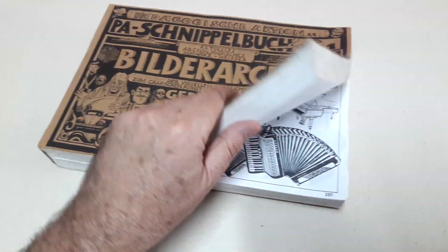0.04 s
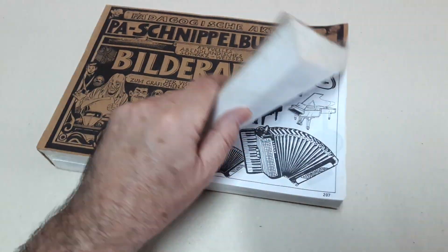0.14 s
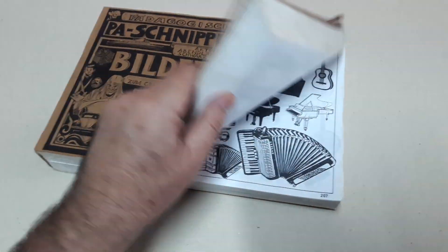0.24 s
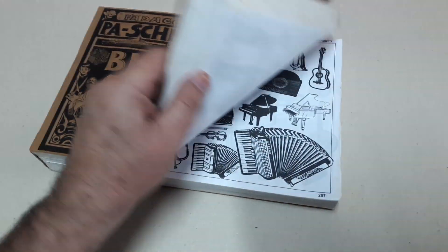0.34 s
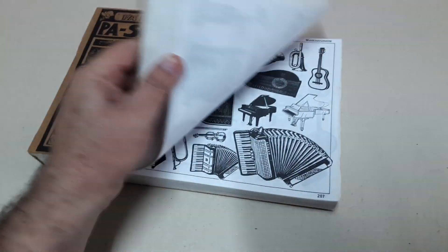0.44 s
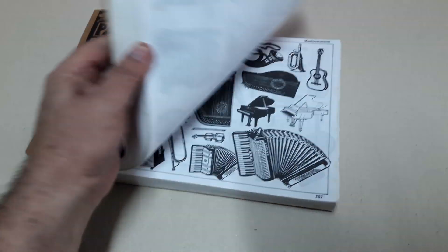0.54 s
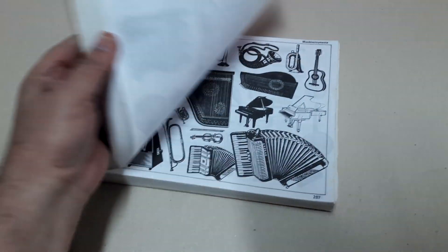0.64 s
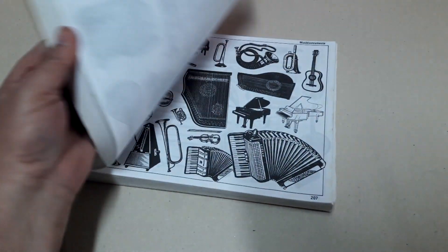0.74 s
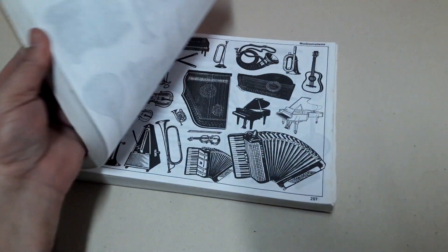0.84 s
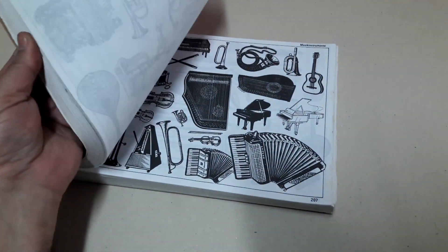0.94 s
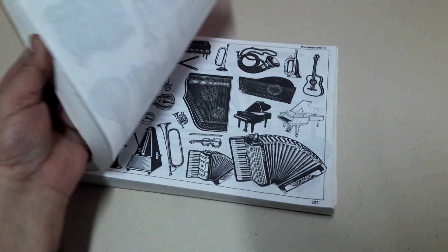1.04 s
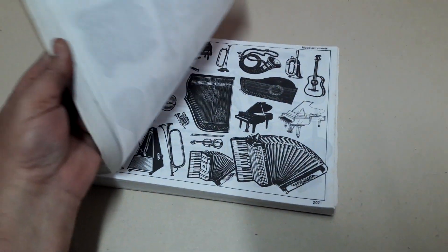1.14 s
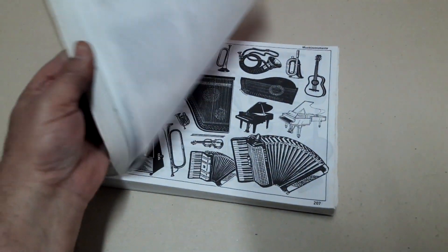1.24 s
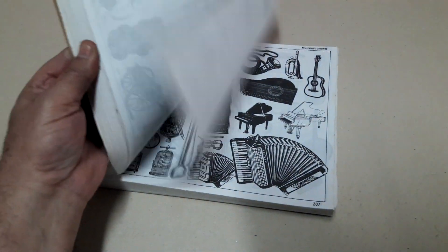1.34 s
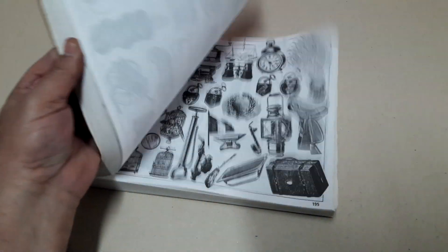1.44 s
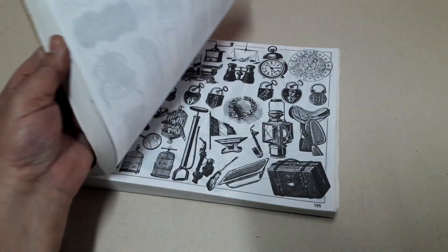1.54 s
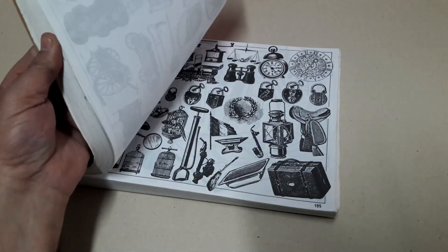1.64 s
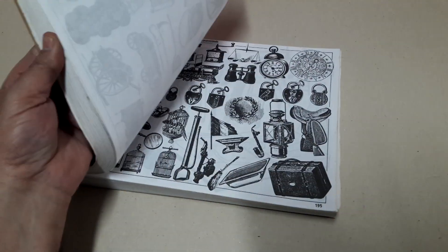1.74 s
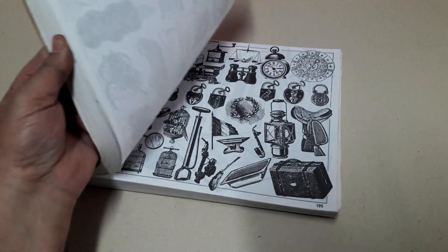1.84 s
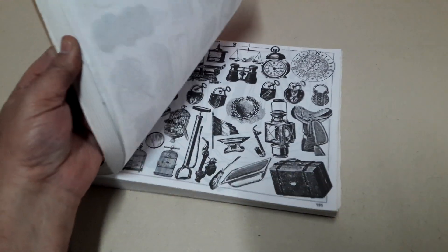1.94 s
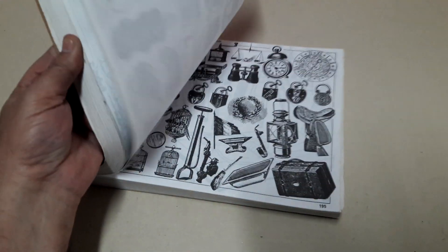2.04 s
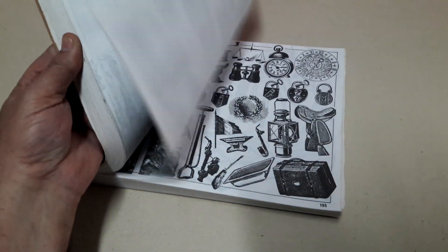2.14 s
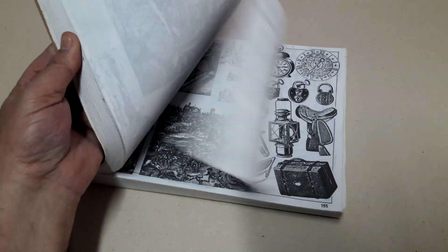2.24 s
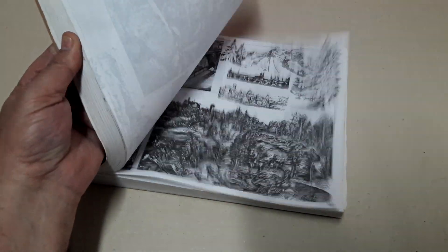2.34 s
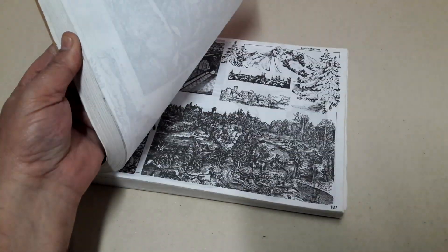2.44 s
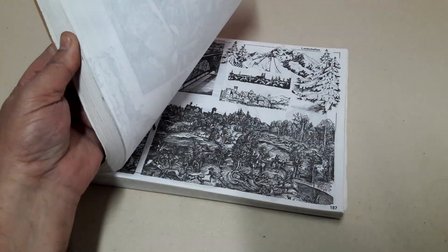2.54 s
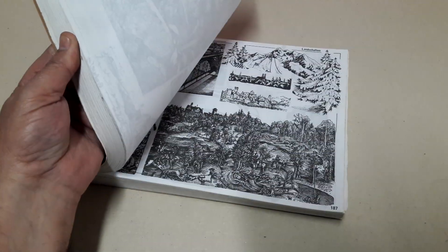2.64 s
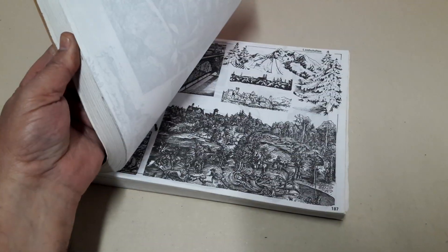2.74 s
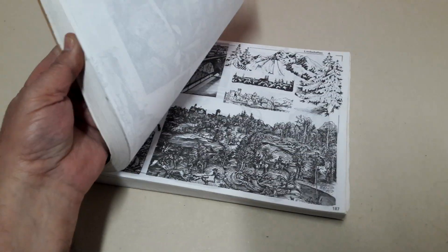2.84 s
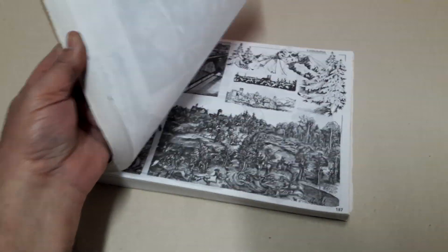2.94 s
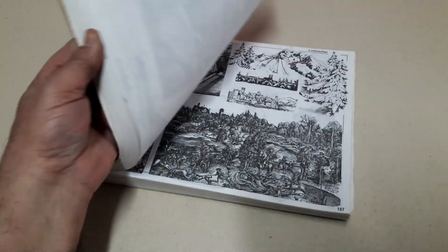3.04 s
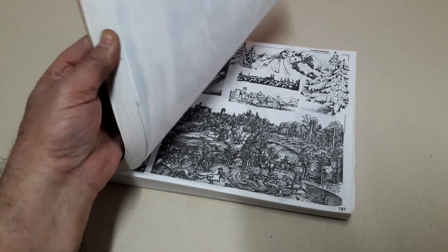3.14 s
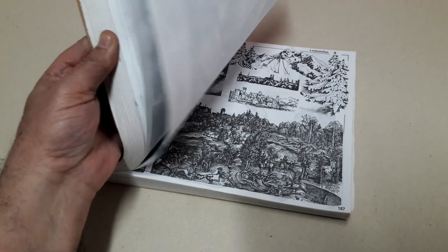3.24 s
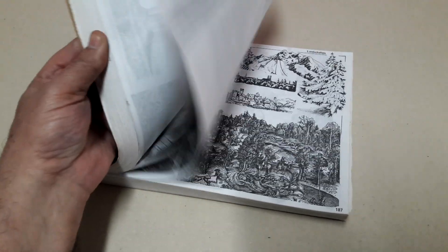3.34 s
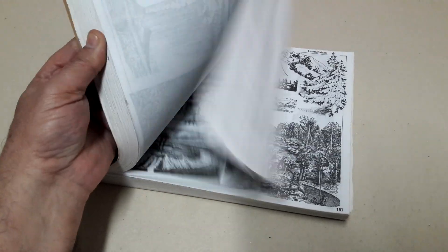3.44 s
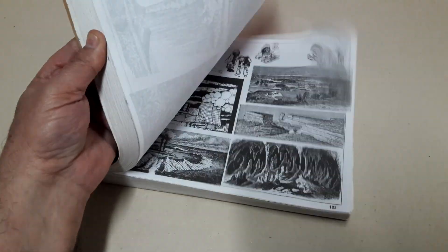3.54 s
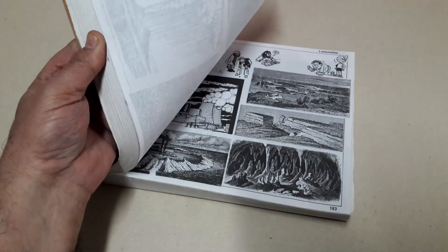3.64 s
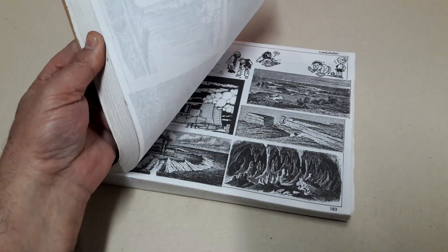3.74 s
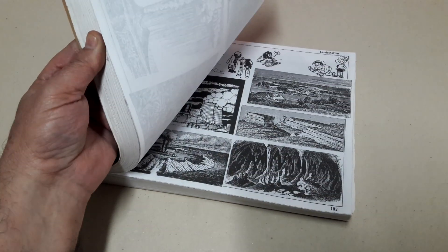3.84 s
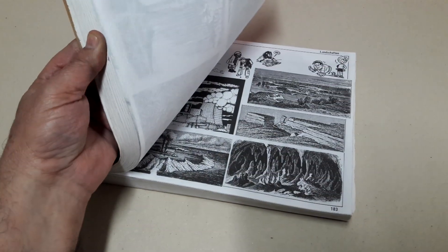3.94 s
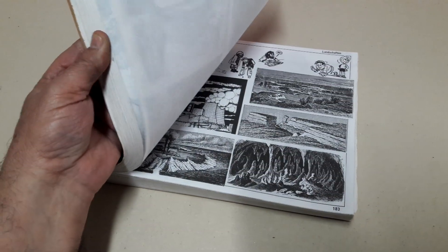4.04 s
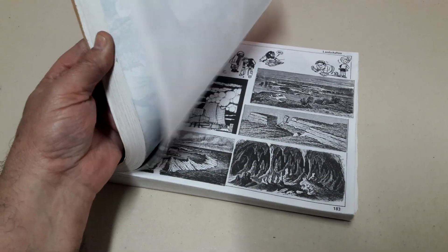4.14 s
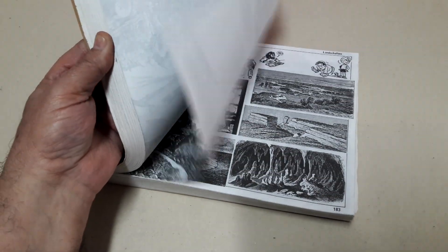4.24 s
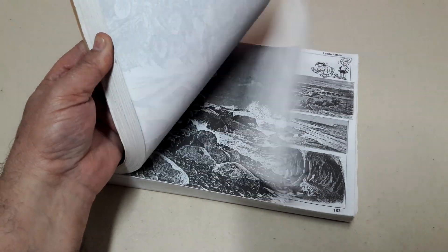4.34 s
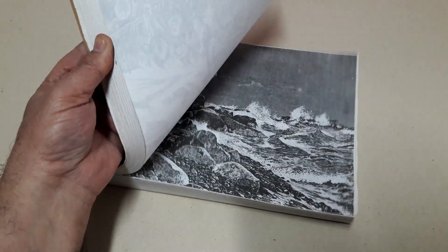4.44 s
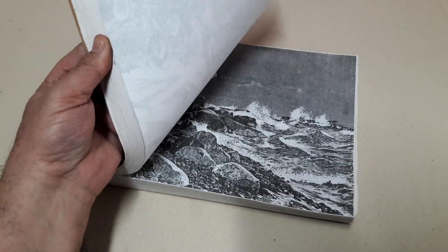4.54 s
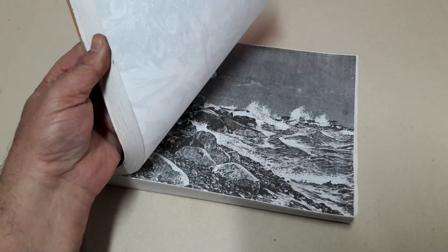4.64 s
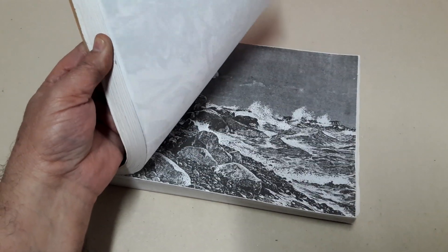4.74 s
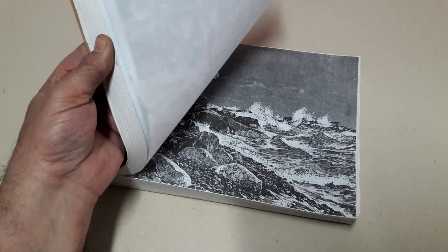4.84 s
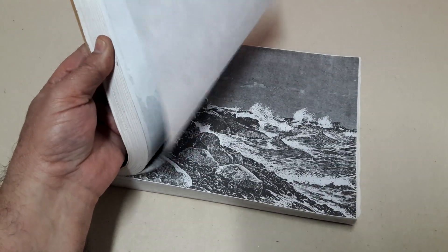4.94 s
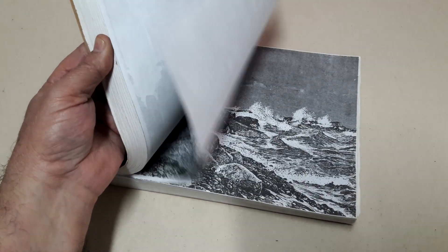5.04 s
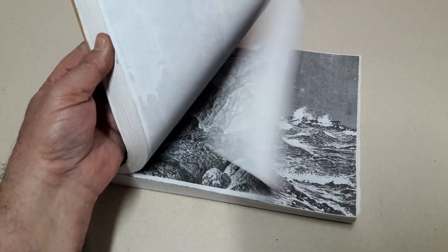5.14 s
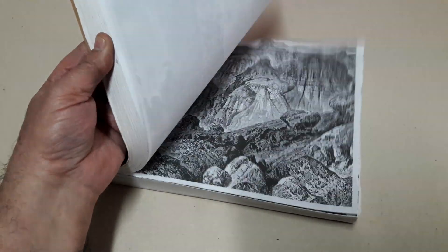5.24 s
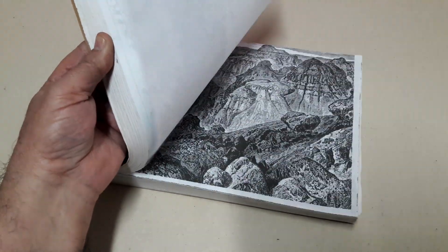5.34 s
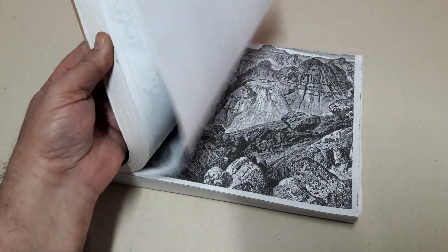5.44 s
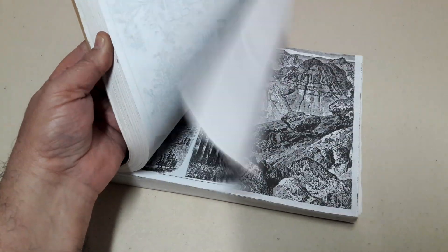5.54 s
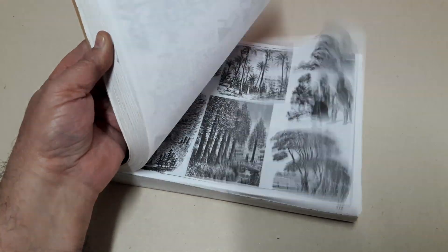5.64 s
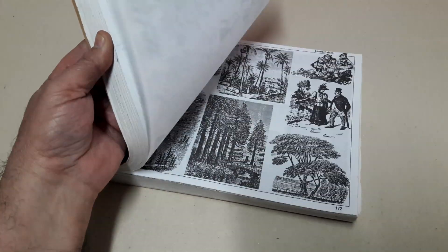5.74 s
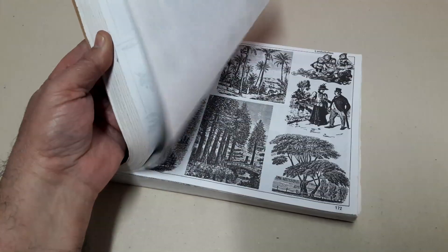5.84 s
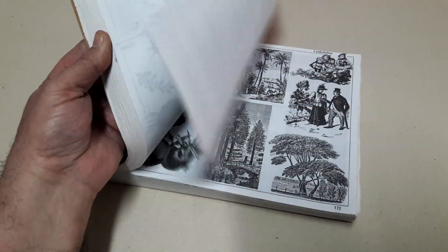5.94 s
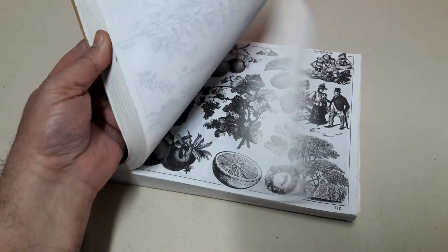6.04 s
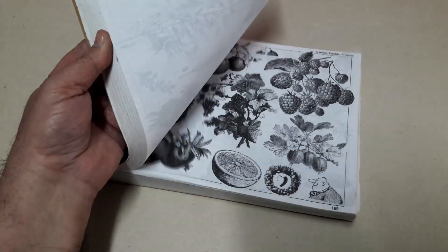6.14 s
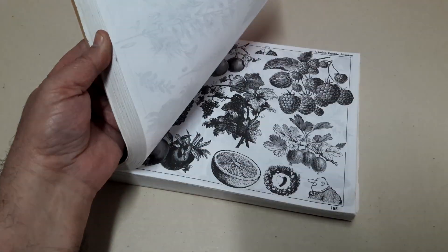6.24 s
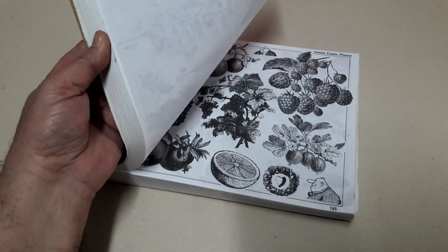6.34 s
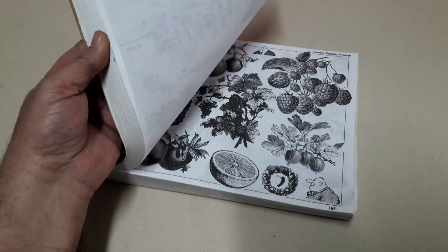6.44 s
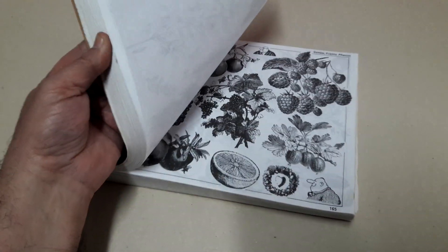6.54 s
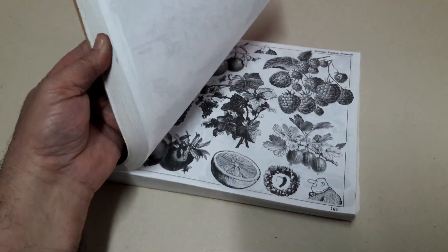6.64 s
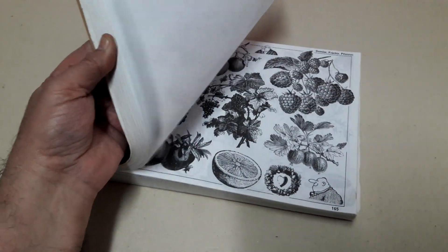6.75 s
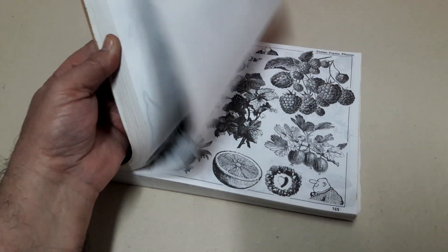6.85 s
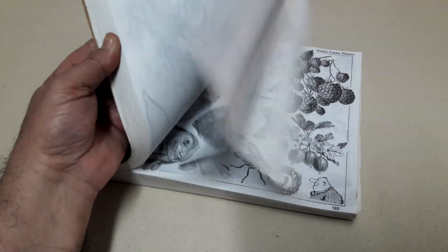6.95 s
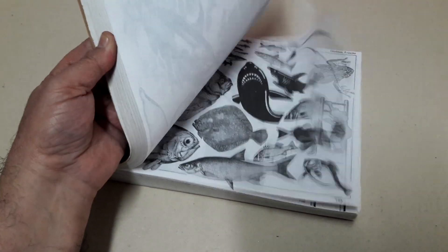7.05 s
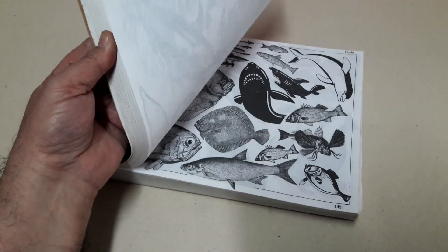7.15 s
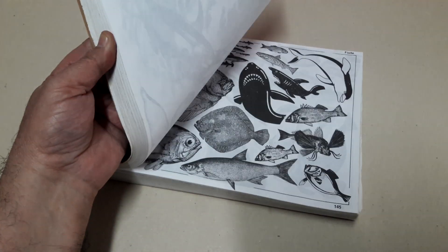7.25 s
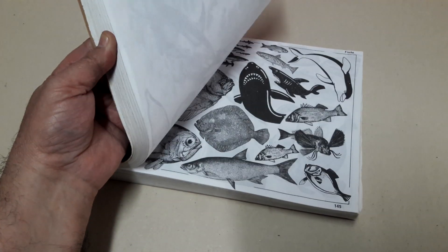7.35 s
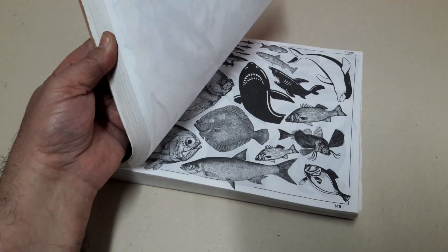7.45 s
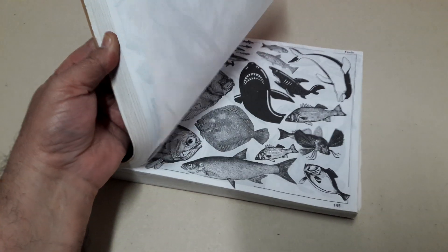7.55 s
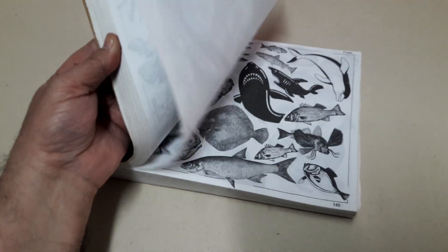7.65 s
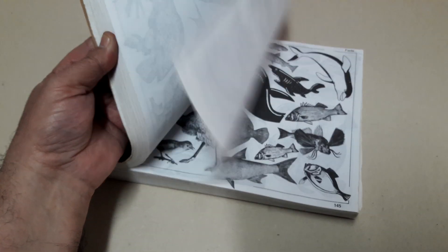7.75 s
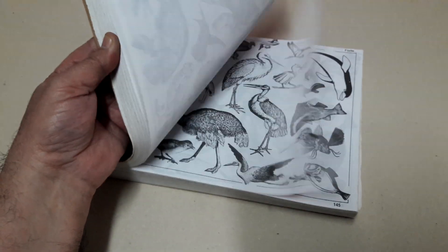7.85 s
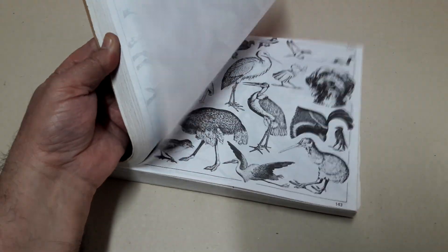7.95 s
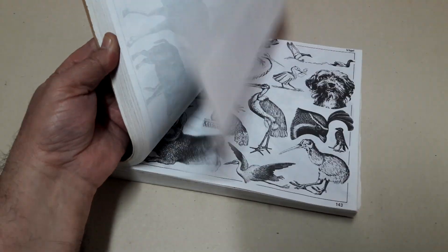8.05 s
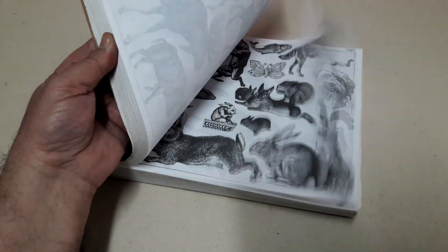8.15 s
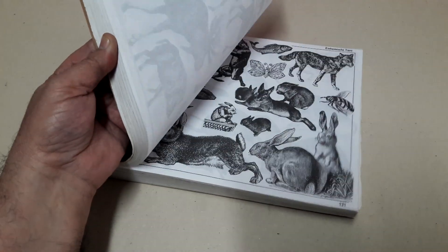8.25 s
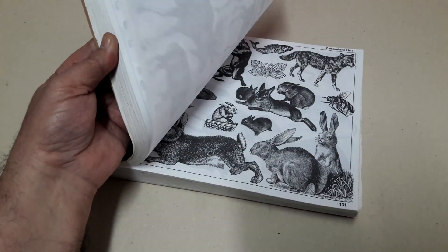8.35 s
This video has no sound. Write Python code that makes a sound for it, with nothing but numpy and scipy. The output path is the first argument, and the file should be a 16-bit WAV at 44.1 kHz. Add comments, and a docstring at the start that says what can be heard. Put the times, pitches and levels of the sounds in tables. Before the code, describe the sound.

A close, almost mono pickup in a small quiet room, with faint hiss and a low house drone underneath. From the start, papery rubbing comes in quick overlapping strokes; a stiff card cover scrapes between about 0.2 and 0.5 seconds, and a single dry electric pop follows at 0.55. Light rustling and a faint crackle come near 1.0. Then pages slap onto the stack: a strong crackling cluster at 1.55, another at 2.4, a brighter flick at 3.6, and softer ones at 4.5, 5.3, 5.75 and 6.2. Between them thin sheets slide off the thumb with soft hisses that climb in pitch, and a light snap falls at 6.65. The sharpest, longest burst rattles at 7.1 to 7.17. More sliding, faint at first, grows around 7.8 and 8.1, and a last firm slap with a low push of air lands at 8.26.

```python
"""Pages of a thick paperback slip off a thumb and slap down on the pile, on a table in a small room.
Throughout: faint room tone, drone and input hiss; from the start: friction noise of pages sliding in strokes.
Within the first half second the card cover scrapes as it is bent open, then one dry electric pop follows.
From about one second on, pages slap down: clusters of buckling snaps, each with a low push of trapped air.
A near-mono microphone hears it all, strong around 2 kHz with a dip near 8 kHz."""
import sys
import numpy as np
from scipy import signal
from scipy.fft import rfft, irfft, next_fast_len
from scipy.io import wavfile
from scipy.ndimage import map_coordinates

SR = 44100
rng = np.random.default_rng(int(sys.argv[2]) if len(sys.argv) > 2 else 0)


def bounce(signal):
    """Save signal as a 16-bit WAV file at the path given by the first command-line argument."""
    frames = np.transpose(np.atleast_2d(signal))
    limited = np.clip(frames, -1, 1)
    pcm = np.round(limited * 32767).astype(np.int16)
    wavfile.write(sys.argv[1], SR, pcm)


N = 369558


def amp(db):
    """Decibel law: level to amplitude ratio."""
    return 10 ** (np.asarray(db) / 20)


def unit(x):
    """Normalization to unit root-mean-square."""
    return x / np.sqrt(np.mean(x ** 2) + 1e-20)


def along(points, hz):
    """Interpolation of (frequency [Hz], value) points on a logarithmic frequency axis."""
    f, v = np.transpose(points)
    return np.interp(np.log(hz + 1), np.log(f + 1), v)


def wobble(rate):
    """Slow random modulation: a smooth curve through rate random knots a second."""
    knots = rng.standard_normal(int(N * rate / SR) + 4)
    return map_coordinates(knots, [np.arange(N) * rate / SR])


def filtered(x, response):
    """Linear filtering: the spectrum of x times a complex response of frequency."""
    m = next_fast_len(N + SR // 2)
    return irfft(rfft(x, m) * response(np.fft.rfftfreq(m, 1 / SR)), m)[..., :N]


def ringing(x, modes, order):
    """Modal resonance: order passes through causal modes, scaled so that white noise keeps its level."""
    def response(f):
        h = 0
        for k, (centre, width, db) in enumerate(modes):
            mode = 1j * f * width / (centre * centre - f * f + 1j * f * width)
            h = h + (-1) ** k * amp(db) * mode  # neighbours alternate in sign
        h = h ** order
        return h / np.sqrt(np.mean(np.abs(h) ** 2))
    return filtered(x, response)


def grit(shape, spiky_db):
    """Impulsive noise: samples of widely scattered sizes, like tiny fibre slips."""
    return unit(rng.standard_normal(shape) * amp(spiky_db * rng.standard_normal(shape)))


def hiss(spectrum, db):
    """Stationary noise: steady, coloured by a spectrum, at a set rms level."""
    return amp(db) * unit(filtered(rng.standard_normal(N), lambda hz: amp(along(spectrum, hz))))


# room tone: (frequency [Hz], relative spectrum level [dB per Hz])
ROOM_TONE = [(29, -44.5), (50, -9.5), (155, 3), (203, -4.5), (329, -6), (483, -8.5), (1910, -14.5),
             (3330, -23), (5530, -32.5), (8100, -35), (11500, -34), (16000, -33.5)]


def room_tone():
    """Broadband background noise with a slight random modulation of its level."""
    return hiss(ROOM_TONE, db=-68) * amp(.7 * wobble(6))


# low drone of the house: (frequency [Hz], width per pass [Hz], relative level per pass [dB])
DRONE = [(119.5, 6.2, -0.5), (160.2, 8.5, -0.5), (297, 16, -3.5)]


def drone():
    """Narrow-band noise: sharp resonances driven by noise, wavering in level around -73.5 dB."""
    tone = unit(ringing(rng.standard_normal(N), DRONE, order=2))
    return amp(-73.5 + 1.5 * wobble(1.8)) * tone


# hiss that differs between the channels: (frequency [Hz], relative spectrum level [dB per Hz])
SIDE_HISS = [(29, -34.5), (50, -8), (111, -4.5), (371, -3), (950, -9), (2620, -15), (3500, -18),
             (7000, -34), (12000, -28), (16000, -28.5)]


def side_hiss():
    """Antiphase noise: faint hiss with opposite sign in the two channels."""
    side = hiss(SIDE_HISS, db=-75.5)
    return np.array([side, -side])


# paper sheen: (frequency [Hz], width per pass [Hz], relative level per pass [dB])
SHEEN_MODES = [(11800, 11000, 0)]
# air under the page and table top: (frequency [Hz], width [Hz], relative level [dB])
PILE_MODES = [(275, 205, 8), (157, 270, -6), (120, 2.4, -8), (430, 710, -1.5)]


def paper(sheet, edge, sheen, pile):
    """Superposition of radiating parts: sheet and edge come ready coloured, sheen and pile resonate here."""
    def steep(f):  # a steep treble roll-off above the edge band
        return 1 / (1 - (f / 7600) ** 2 + .9j * f / 7600) ** 2
    sheen = ringing(sheen, SHEEN_MODES, order=2)
    pile = ringing(pile, PILE_MODES, order=1)
    return sheet + filtered(edge, steep) + sheen + pile


# pages sliding on thumb and pile: (peak time [s], time for speed to climb 20 dB [s],
# time for speed to sink 20 dB [s], sheet level [dB], edge level [dB], sheen level [dB],
# flutter level [dB], edge pitch at the peak [Hz]); times are limited and levels trimmed in use
PAGE_STROKES = [(.005, 5.5, 0.12, -60, -63, -75.5, -54, 4400),
                (0.062, -0.2, -0.74, -59.5, -67, -84, -61, 3960),
                (.19, 0.15, 0.25, -60, -65.5, -80, -62.5, 4540),
                (0.302, 0, 0.16, -64.5, -66, -78, -61, 4260),
                (.36, -2.37, .4, -68, -66.5, -90, -60.5, 4250),
                (0.491, -1.6, 0, -59, -68, -85, -60.5, 4100), (.63, -0.2, -0.1, -72, -85, -100, -78, 4600),
                (.775, 0, 0.3, -65.5, -69.5, -95, -71, 3960),
                (.965, 0.05, 0.2, -60.5, -66.5, -85, -58.5, 4100),
                (1.101, -3, -2.3, -68.5, -81, -100, -74.5, 4330),
                (1.36, 0.07, 0.2, -63, -69.5, -75, -70.5, 5000),
                (1.43, 0.4, 0.8, -70, -78.5, -92, -76, 4360), (1.86, 0.23, 3.5, -69.5, -82, -86, -77, 5140),
                (1.99, -0.2, 0.17, -55.5, -75, -86, -63, 4100), (2.205, 0.16, 0, -61, -65, -79, -76, 6100),
                (2.262, 0.2, 0.12, -60.5, -58.5, -71.5, -75, 6340),
                (2.76, 0.1, 0, -64, -78, -97, -69.5, 4230), (3.22, -0.6, .4, -71, -81.5, -91, -71.5, 4520),
                (3.43, 0.1, -0.26, -60.5, -66.5, -73, -67.5, 6070),
                (3.486, 0.08, 0.12, -62.5, -57.5, -61, -63.5, 6500),
                (3.515, 0.05, 0.05, -51, -58.5, -62.5, -59, 4720),
                (3.565, -0.4, 0.2, -66, -81, -78, -59.5, 4400),
                (3.75, 0.53, 0.33, -64, -71, -88.5, -68, 4180),
                (3.88, -0.1, 0.05, -62.5, -75, -92, -63, 4200),
                (4.25, 0.02, 0.54, -63, -85, -94, -61.5, 4310),
                (4.355, 0.08, 0.03, -60, -60, -71.5, -58, 6340),
                (4.45, 0.26, 0.33, -64.5, -86, -92, -55, 4400),
                (4.618, 0.3, 0.1, -60.5, -75, -92, -59.5, 4600),
                (5.03, 0.2, 0.7, -69, -84.5, -90.5, -72, 4110),
                (5.12, 0.06, 0.15, -62, -65, -80, -69.5, 4400),
                (5.174, 0.13, .05, -61, -61, -74, -76, 6400),
                (5.24, -0.3, .09, -76.5, -81, -89.5, -67, 4300),
                (5.558, 0.1, 0.13, -55, -62.5, -74.5, -76, 4060),
                (5.618, 0.16, .05, -58.5, -57, -67.5, -66, 5300),
                (5.85, 0.3, 0.15, -71, -74, -86, -67, 3900),
                (5.904, -0.2, 0.16, -61.5, -74, -85, -76, 3860), (6.03, .1, .09, -59, -55, -79, -79, 5400),
                (6.07, .05, 0.05, -60.5, -57, -70, -65, 6700),
                (6.35, 0.15, 0.5, -60.5, -68, -81.5, -64, 4290),
                (6.799, .07, 0.13, -62, -72, -88, -67.5, 4230),
                (6.93, -0.12, 0.1, -64, -66, -80, -75, 5200),
                (6.993, .035, 0.13, -60.5, -66.5, -70.5, -65.5, 6300),
                (7.449, 3.5, .4, -75.5, -84.5, -88.5, -78, 4200),
                (7.66, 0, .12, -65.5, -74, -86.5, -72, 4200),
                (7.765, 0.2, 0.03, -63, -62.5, -79.5, -78, 4570),
                (7.819, 0.17, 0.08, -57.5, -54.5, -70, -79, 6200),
                (8.022, .03, -0.05, -53, -76, -84, -61, 4500),
                (8.085, -0.02, .07, -59.5, -59.5, -81, -81, 6240),
                (8.13, 0.29, 0.1, -63, -65, -68.5, -72, 5500), (8.18, 0, .05, -71, -73, -80, -72, 4830),
                (8.235, 0.1, 0.2, -61, -69, -86, -55, 4200)]
# growth with speed: (sheet, edge, sheen, flutter) exponents [no unit]
SPEED_EXPONENTS = (1.01, 1.3, 4.5, 1.2)
SPEED_ROUNDNESS = 1.28  # 1 = a pointed peak, 2 = a bell
SLOW_EDGE_HZ, PITCH_EXPONENT = 1900, 2.3  # start of the edge pitch curve, its power of stroke progress
REST_FLUTTER_DB = -74.5  # the held pages never lie quite still


def strokes():
    """Power laws of friction noise: levels follow speed as it peaks, strokes add in power, edge pitch climbs."""
    s, climb, sink, *levels_db, top_hz = np.transpose(PAGE_STROKES)[:, :, None]
    t = np.arange(0, N / SR, .001)
    time_20_db = np.clip(np.where(t < s, climb, sink), .014, .6)
    speed = amp(-20 * (np.abs(t - s) / time_20_db) ** SPEED_ROUNDNESS)
    power = [(amp(db) * speed ** law) ** 2 + 1e-14 for db, law in zip(levels_db, SPEED_EXPONENTS)]
    progress = np.clip(1 + (t - s) / np.clip(climb, .004, 1), 1e-6, 1)  # reaches 1 at the peak and stays
    stroke_hz = SLOW_EDGE_HZ + (top_hz - SLOW_EDGE_HZ) * progress ** PITCH_EXPONENT
    pitch = np.sum(power[1] * stroke_hz, axis=0) / power[1].sum(axis=0)  # louder edges count more
    sheet, edge, sheen, pile = [np.sqrt(p.sum(axis=0)) for p in power]
    pile = np.hypot(pile, amp(REST_FLUTTER_DB))
    return [np.interp(np.arange(N) / SR, t, c) for c in (sheet, edge, sheen, pile, pitch)]


def edge_glide(rub, edge, pitch):
    """Moving resonance: the edge hiss glides, by power crossfade of fixed bands, as the free length changes."""
    bands_hz = range(3600, 7300, 600)
    pitch = np.maximum(pitch, bands_hz[0])
    glide = 0
    for hz in bands_hz:
        share = np.sqrt(np.clip(1 - np.abs(pitch - hz) / bands_hz.step, 0, 1))
        glide = glide + share * ringing(rub(edge * amp(-8.5)), [(hz, 900, 0)], order=2)
    # a fixed hiss stays around the glide
    return glide + ringing(rub(edge * amp(-9)), [(4300, 2500, 0), (6700, 1500, 2.5)], order=1)


# page resonances: (frequency [Hz], width per pass [Hz], relative level per pass [dB])
SHEET_MODES = [(1570, 650, 6), (2690, 300, 4), (960, 510, 7), (3110, 480, 4.5)]


def slide():
    """Stick-slip friction: one shared uneven catching modulates the noise that drives all bands."""
    sheet, edge, sheen, pile, pitch = strokes()
    catch_db = 1.8 * wobble(30) + 1.5 * wobble(120)

    def rub(gain):  # each band adds a little unevenness of its own
        return gain * amp(catch_db + 0.51 * wobble(43)) * grit(N, spiky_db=3.5)
    edge_noise = edge_glide(rub, edge, pitch)
    sheet_noise = ringing(rub(sheet), SHEET_MODES, order=2)
    return paper(sheet_noise, edge_noise, rub(sheen), rub(pile))


# the hand bends the card cover open: (time [s], scrape level [dB])
COVER_SCRAPE = [(0.1, -86), (0.186, -65), (0.29, -66), (0.302, -55.5), (0.33, -84.5), (0.348, -62.5),
                (0.424, -67.5), (0.432, -72), (0.498, -62), (0.53, -75.5)]
# card resonance: (frequency [Hz], width per pass [Hz], relative level per pass [dB])
CARD_MODES = [(3000, 1300, 0)]


def cover():
    """Friction-driven resonance: uneven gritty noise excites the bending card cover."""
    level_db = np.interp(np.arange(N) / SR, *np.transpose(COVER_SCRAPE), left=-120, right=-120)
    scrape = amp(level_db + 2.5 * wobble(45)) * grit(N, spiky_db=2.5)
    return ringing(scrape, CARD_MODES, order=2)


POP_S, POP_GAIN_DB = .5467, -1


def pop():
    """Step response: a sudden voltage step drained by the input low-cut gives a spike, a dip and a rebound."""
    def response(f):
        p = 2j * np.pi * f + 1 / SR  # the small real part avoids division by zero
        corner = 2 * np.pi * 105
        cut = p * p / (p * p + 1.2 * p * corner + corner ** 2)
        drain = 1 / (p + 2 * np.pi * 70)
        soften = 1 / (1 + 1j * f / 4000) ** 2 - 0.04 * (f / 12000) ** 3
        delay = np.exp(-p * POP_S)
        return SR * cut * drain * soften * delay
    impulse = np.eye(1, N)[0]
    return amp(POP_GAIN_DB) * filtered(impulse, response)


def even(rows, floor):
    """Spectral whitening: levels the chance peaks of each short burst, keeping its energy."""
    energy_root = np.linalg.norm(rows, axis=1, keepdims=True)
    z = rfft(rows)
    out = irfft(z / (np.abs(z) + floor * energy_root), rows.shape[1])
    return out * energy_root / np.linalg.norm(out, axis=1, keepdims=True)


def bent(rows, hz, q):
    """Bending resonance: each row rings at its page pitch with a weak broad skirt; soft paper damps treble."""
    f = np.fft.rfftfreq(rows.shape[1], 1 / SR)

    def mode(width):
        return 1j * f * width / (hz * hz - f * f + 1j * f * width)
    limp = f / (1.42 * hz)
    soft = 1 / (1 - limp ** 2 + 1.3j * limp) ** 2
    response = (mode(hz / q) ** 2 + 0.18 * mode(1.9 * hz)) * soft
    out = irfft(rfft(rows) * response, rows.shape[1])
    return out / np.linalg.norm(out, axis=1, keepdims=True)


# paper buckling and slapping: (peak time [s], level [dB], sheet pitch [Hz], trapped-air thud [dB re level],
# edge [dB re level], sheen [dB re level], length [s]); levels before the trims in snaps()
PAGE_SNAPS = [(0.9732, -43.5, 1920, -10.5, -13, -19, 0.0097), (0.9837, -44, 2190, -4.5, -8, -25, 0.0052),
              (0.995, -45, 1740, -3.5, -10.5, -26, 0.0043), (1.528, -29, 2290, -15.5, -15, -39, 0.0014),
              (1.5331, -25, 2124, -21, -36, -47, 0.0024), (1.5388, -26.5, 2020, -10, -13.5, -41.5, 0.005),
              (1.5458, -22.5, 1790, -16.5, -43, -67.5, 0.0035),
              (1.5493, -31, 1670, -8.5, -15, -34.5, .0045), (1.5562, -15, 1920, -30, -45, -63, 0.00074),
              (1.56, -13.5, 1790, -20.5, -40, -63.5, 0.0015), (1.568, -28, 1730, -2.5, -23, -40, 0.0053),
              (1.854, -44.5, 2550, -20, -6.5, -24, 0.0015), (2.251, -53, 2320, -16, 0.5, -14, 0.0047),
              (2.398, -35.5, 1730, -6.5, -29, -40, 0.0039), (2.4043, -17, 1553, -6, -10, -37, 0.00078),
              (2.4072, -14.5, 1890, -4, -23, -41, 0.0014), (2.4196, -28.5, 1795, -10, -35, -55.5, 0.003),
              (2.432, -21, 1770, -9.5, -36, -55, 0.0032), (2.448, -27.5, 1660, -18.5, -38, -59, 0.0032),
              (2.7707, -47, 1550, -11, -22.5, -34.5, .0016), (2.888, -60, 1900, -8.5, -15, -12, 0.0025),
              (3.482, -45, 2190, -31, -11, -15.5, 0.0033), (3.51, -44.5, 1500, -15.5, -21, -27, .005),
              (3.5915, -41, 1630, -11, -30, -42, .004), (3.5994, -40.5, 2150, -12, 1, -2.5, 0.0013),
              (3.607, -19, 2540, -23.5, -2.5, -21, 0.0032), (3.869, -44, 1980, -17, -15.5, -20.5, .0013),
              (4.4882, -36.5, 1500, -29, -39, -40.5, 0.0024), (4.4942, -32, 1560, 1.5, -14.5, -41, 0.00096),
              (4.5, -31, 1840, -6.5, -23, -60, .0018), (4.511, -36.5, 1534, -2, -34, -45, 0.0045),
              (4.5186, -35.5, 1700, -5.5, -34, -43, 0.0021), (4.617, -51.5, 1980, -14.5, -6.5, -21, 0.0025),
              (4.9527, -52, 1900, -30, -18.5, -22.5, 0.001), (4.966, -52, 2090, -16, -14.5, -22, 0.00084),
              (5.106, -49.5, 2170, -13, -16, -31, .0014), (5.321, -44.5, 1970, -5.5, -16, -28, 0.0012),
              (5.325, -40.5, 1440, 3, -15.5, -24, 0.0029), (5.335, -40, 1680, -28, -27, -39, 0.0047),
              (5.351, -42, 1640, -5, -30, -37, 0.0016), (5.7453, -37.5, 1630, -16, -33, -52, 0.0045),
              (5.7512, -29.5, 1670, 0.5, -17.5, -51, 0.0021),
              (5.7664, -32.5, 2000, -4.5, -23, -51.5, 0.0041), (5.9032, -47, 2430, -18, 1, -23.5, .0005),
              (6.078, -50, 1330, -6, -8.5, -10, 0.0026), (6.161, -57, 2330, 4, 0, -7, 0.0019),
              (6.183, -38, 1630, -11, -27, -42.5, 0.0051), (6.1879, -26, 1900, 0, -16, -44, 0.0017),
              (6.2013, -30, 1550, -10, -44, -47, 0.0023), (6.216, -31.5, 1630, -4, -21, -44, .0018),
              (6.572, -68, 2500, -18, -1, -15, 0.00085), (6.654, -34.5, 2070, -13.5, -17.5, -33, .003),
              (6.717, -41, 1650, -11, -19, -36.5, 0.0033), (7.082, -43.5, 1890, -4, -19.5, -34.5, 0.0022),
              (7.0884, -10.5, 1990, -15, -15.5, -35, 0.001), (7.093, -19.5, 2106, -17.5, -21, -43, .003),
              (7.098, -19.5, 2200, -25, -19, -44.5, .004), (7.104, -19, 2110, -11, -10, -56, 0.0047),
              (7.112, -27, 2450, -7, -3.5, -14, .001), (7.1425, -20.5, 3540, -14.5, -13, -45, 0.0018),
              (7.1446, -19.5, 3130, -21, -20, -54.5, .003), (7.149, -12.5, 2290, -34, -18, -58, .002),
              (7.162, -17.5, 2585, -9.5, -14.5, -45, .001), (7.166, -14.5, 2430, -19.5, -27, -50.5, 0.0017),
              (7.173, -23.5, 2050, -6.5, -22, -42.5, 0.0043), (7.5184, -56.5, 1960, -5, -23, -24.5, 0.0011),
              (7.554, -63, 2200, -8, -15, -30, .0015), (7.8078, -50.5, 2230, -4.5, -1, -24.5, .002),
              (7.823, -43.5, 1900, -11, -7, -26.5, 0.0026), (7.8292, -39, 1900, -6.5, -13, -29, 0.0027),
              (7.972, -58.5, 1390, -5, -27, -35, .003), (7.998, -52.5, 1400, 7, -22, -38.5, 0.0024),
              (8.023, -42, 1510, -13, -36, -41.5, .0014), (8.1249, -48.5, 1930, -29, -11, -18, 0.0051),
              (8.251, -45, 1730, -29, -10, -32.5, 0.0041), (8.258, -15.5, 1850, -1.5, -13, -40, 0.0029),
              (8.264, -19.5, 2060, -17.5, -13.5, -50.5, 0.0045),
              (8.271, -28, 1890, -3.5, -27, -42.5, 0.0032), (8.2842, -31, 1980, 4, -4, -26, 0.0022)]
# page edge: (frequency [Hz], width per pass [Hz], relative level per pass [dB])
EDGE_MODES = [(3540, 2400, 12.5), (6620, 18000, -14.5)]
SNAP_RISE, SNAP_FALL = 0.72, 1.186  # swell and break-off of a snap, in lengths


def snaps():
    """Buckling instability: crackle swells and breaks off, the treble briefer; squeezed air pushes once."""
    lead = SR // 50
    t = (np.arange(3 * lead) - lead) / SR
    s, db, sheet_hz, thud_db, edge_db, sheen_db, length = np.transpose(PAGE_SNAPS)[:, :, None]
    span = np.clip(length * np.where(t < 0, SNAP_RISE, SNAP_FALL), .0003, .012)
    steep = np.where(t < 0, 1.9, 1.2)
    crackle = grit((len(PAGE_SNAPS), len(t)), spiky_db=0.5)

    def shape(stretch):
        return np.exp(-np.abs(t / (stretch * span)) ** steep)
    push = -1.5 * np.exp(-(t / 0.00025) ** 2) + 0.2 * shape(0.23) * crackle
    body = bent(even(shape(1.32) * crackle, floor=1.0), sheet_hz, q=1.1)
    body = body * np.linalg.norm(shape(1.09), axis=1, keepdims=True)  # longer snaps hold more energy
    parts = [amp(db - 0.5) * body,
             amp(db + edge_db + 2.5) * even(shape(0.6) * crackle, floor=0.37),
             amp(db + sheen_db - 3.0) * even(shape(.75) * crackle, floor=.4),
             amp(db + thud_db - 9) * push]
    # lay every burst at its time; overlaps add
    where = (np.round(s * SR).astype(int) - lead + np.arange(len(t))).ravel()
    sheet, edge, sheen, pile = [np.bincount(where, p.ravel(), N + SR)[:N] for p in parts]
    return paper(sheet, ringing(edge, EDGE_MODES, order=2), sheen, pile)


# decay of the room: (frequency [Hz], time to fall 60 dB [s])
ROOM_DECAY = [(100, 0.13), (260, 0.39), (1840, 0.28), (4850, 0.25), (9000, 0.27), (12800, 0.22)]


def room(x):
    """Reverberation: exponential decay with its own speed per frequency; every 0.3 s meets a new tail."""
    out, step = np.zeros(N + 2 * SR), int(.3 * SR)
    for a in range(0, N, step):
        hz, t, z = signal.stft(rng.standard_normal(SR // 2), SR, nperseg=256)
        decay = amp(-60 * t / along(ROOM_DECAY, hz)[:, None])
        tail = signal.istft(z * decay, SR, nperseg=256)[1]
        wet = signal.fftconvolve(x[a:a + step], tail / np.linalg.norm(tail))
        out[a + 130:][:len(wet)] += wet  # 130 samples of travel, about 3 ms
    return out[:N]


def scene():
    """Superposition of direct sound, reverberation and pop, the same in both channels."""
    rustle = slide() + cover()
    hits = snaps()
    reverb = amp(-9.0) * room(hits + amp(-14) * rustle)
    mid = hits + reverb + rustle + pop()
    return np.array([mid, mid])


def record(dry):
    """Destructive interference at the microphone port, additive noise and DC offset, then band limiting."""
    def dip(f):  # the port cancels a band near 8 kHz
        return 1 - .6 * 1j * f * 1800 / (8050 ** 2 - f * f + 1j * f * 1800)
    floor = room_tone() + drone() + side_hiss()
    offset = -.0005  # of full scale
    return filtered(filtered(dry, dip) + floor + offset, lambda hz: hz < 15870)


dry = scene()
out = record(dry)
bounce(out)
```